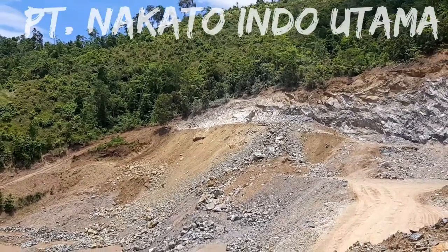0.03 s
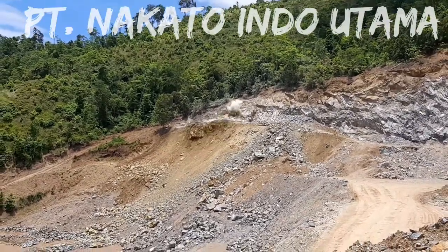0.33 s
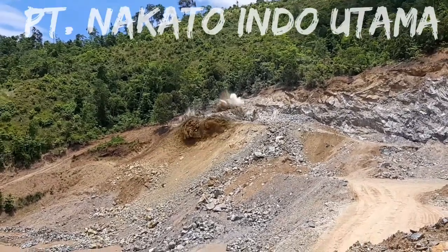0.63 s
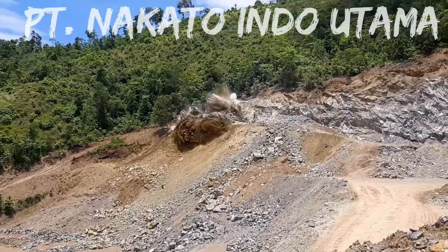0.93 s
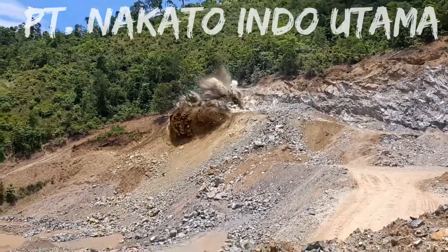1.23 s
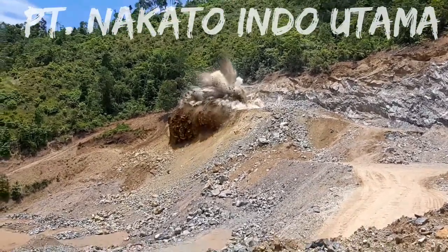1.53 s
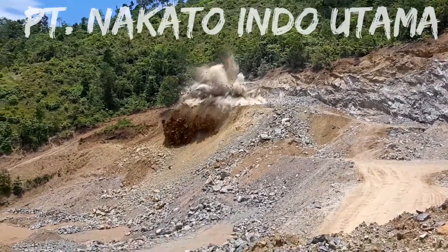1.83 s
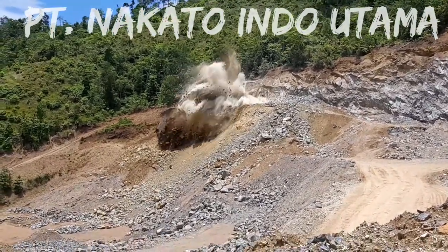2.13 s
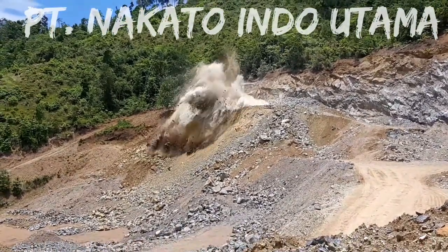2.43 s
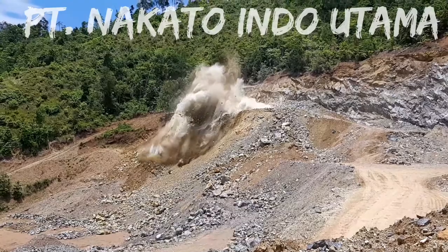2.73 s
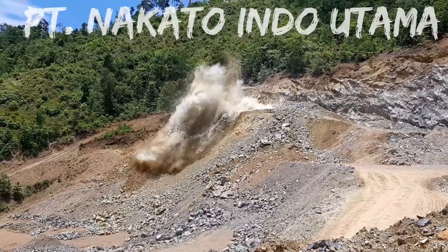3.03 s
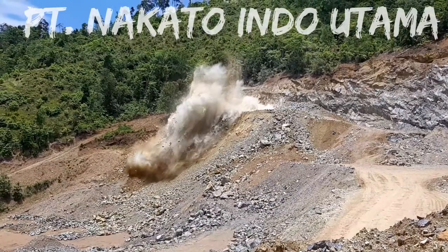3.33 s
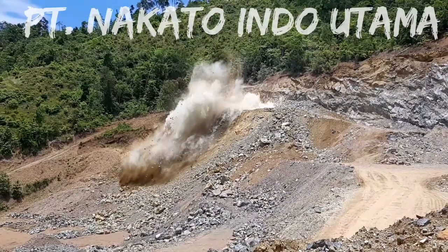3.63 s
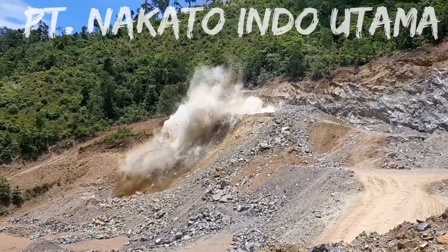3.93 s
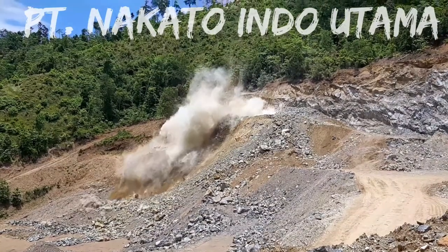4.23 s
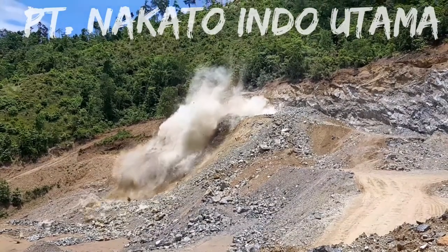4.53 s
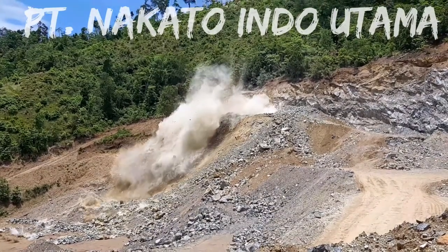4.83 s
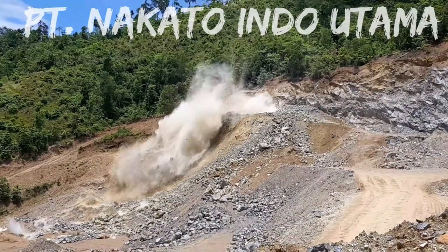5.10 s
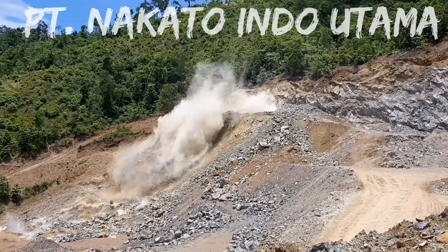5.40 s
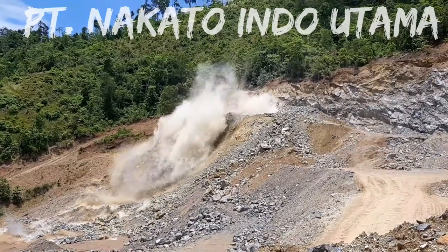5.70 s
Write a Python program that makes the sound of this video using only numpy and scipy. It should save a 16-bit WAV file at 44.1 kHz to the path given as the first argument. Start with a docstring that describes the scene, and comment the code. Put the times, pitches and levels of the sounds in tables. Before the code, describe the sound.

A low ground rumble with a few dull thumps starts immediately, heard outdoors from across a quarry. At about 0.6 seconds a heavy blast thuds, with a brief tearing of rock and a spurt of gas. At 0.8 seconds a sharp, punchy crack follows, scattering off the hillside in a short hissing echo. The rumble fades by about 1.5 seconds, leaving a lull with faint trickling stones.

From around 2 seconds a rockslide swells, and the bulk of the rock lands at 3 seconds. Boulders thump heavily between 3.2 and 4 seconds over a dense roar of clattering stones and hissing gravel. The slide grows brighter as it nears, and from about 4.3 to 5.7 seconds big rocks knock together, burst and splinter with sharp clacks. The slide is still pouring, slightly weaker, at the end near 6 seconds.

```python
"""A quarry blast heard from across the pit. The ground shakes first and the blast thuds;
the rock tears open and vents gas, then the air shock cracks and scatters off the hillside.
The thrown rock lands and pours down the slope: boulders thump, stones clatter, gravel hisses.
Heavy blows are single pressure swings; rumble, echoes and slide are mostly filtered random impacts."""
import sys
import numpy as np
from scipy import signal
from scipy.fft import rfft, irfft, next_fast_len
from scipy.io import wavfile
from scipy.ndimage import uniform_filter1d, map_coordinates

SR = 44100
rng = np.random.default_rng(int(sys.argv[2]) if len(sys.argv) > 2 else 0)


def generate_wav(signal):
    """Clip the signal to [-1, 1] and save it as 16-bit WAV at the path in sys.argv[1]."""
    frames = np.transpose(np.atleast_2d(signal))
    scaled = np.clip(frames, -1, 1) * 32767
    pcm = np.round(scaled).astype(np.int16)
    wavfile.write(sys.argv[1], SR, pcm)


N = 258426

# air and ground spectra: (frequency [Hz], gain [dB])
AIR_EQ = [(100, 0), (1000, -9), (4000, -17), (5500, -12), (8200, -22), (12000, -20), (16000, -26)]
GROUND_EQ = [(12, -40), (25, -14), (36, -12), (53, 3), (88, 4), (130, -4), (170, -13), (220, -19),
             (400, -50), (800, -100)]
BOOM_EQ = [(20, -35), (55, -1), (90, 2), (130, 2), (175, -14), (260, -36), (600, -100)]
# falling rock spectra: (frequency [Hz], gain [dB])
THUMP_EQ = [(15, -16), (25, -43), (48, -3.5), (92, -0.5), (115, 2.5), (210, -11.5), (270, -58), (460, -120)]
STONE_EQ = [(110, -33.5), (190, -1.5), (247, -1), (290, 4.5), (345, -0.5), (520, 0), (640, 0.5), (770, -8),
            (1000, -5), (1200, -13.5), (1560, -38), (2640, -120)]
CHIP_EQ = [(700, -27.5), (1000, -0.5), (1200, -5), (1400, 6), (1560, 3.8), (1800, 5.7), (2000, 5.5),
           (2250, 0), (2600, -6), (2780, -0.5), (3050, -1.5), (3320, 0.5), (3560, -6), (3780, -2),
           (4050, -8.5), (4400, -10), (4900, -6), (5600, -11), (7500, -46)]
PEBBLE_EQ = [(1200, -12), (2000, -4), (2600, -25), (3350, 5), (3580, -3), (3820, 7), (4150, -2),
             (4800, -10), (6500, -21), (8200, -13.5), (9800, -9), (13000, -29), (15500, -52)]
GRIT_EQ = [(3060, -15.5), (5200, 1), (7170, -5.5), (8200, -15), (9040, -9), (9880, -11.5), (11000, -22),
           (14000, -29.5), (14800, -50), (15800, -35)]
CLACK_EQ = [(200, -18), (550, -2), (1200, -4), (1900, 0), (2600, -6), (3600, -3), (6000, -11), (8200, -22),
            (9700, -19), (15000, -47)]
RUBBLE_EQ = [(150, -15), (550, 3), (900, -4), (1200, -6), (1450, 0), (2100, -2), (2600, -13), (3600, -7),
             (8000, -27), (15000, -48)]
# blast and echo spectra: (frequency [Hz], gain [dB])
TEAR_EQ = [(120, -30), (220, -5), (300, 0), (450, -10), (650, -19), (900, -40), (1500, -65), (4000, -90)]
GAS_EQ = [(250, -10), (600, 12), (1100, 7), (2200, -9), (3200, -9), (4200, -20), (5500, -18), (8200, -40),
          (9700, -39), (15000, -58)]
SNAP_EQ = [(300, -6), (1400, 0), (2300, -9), (3100, -4), (4200, -20), (6000, -23), (8000, -35),
           (15000, -48)]
SHOCK_EQ = [(120, -10), (300, -2), (700, 2.5), (1000, -2), (1600, 1.5), (2600, -13), (3800, -12),
            (5000, -10), (7500, -22), (9500, -17), (15500, -27)]
ECHO_BODY_EQ = [(94, -21.5), (160, -3.5), (238, -9), (295, -3.5), (324, -11), (590, -11), (657, -17.5),
                (741, -18), (1090, -20), (1180, -15.5), (2800, -27), (3640, -58), (6160, -120)]
ECHO_TREBLE_EQ = [(1530, -33), (2600, 1.5), (3290, 5.5), (4960, 3.5), (8200, -14), (9400, -15),
                  (11800, -33), (14900, -33), (16000, -31)]
ECHO_HISS_EQ = [(500, -20), (1800, -2), (4000, -5), (5700, 0), (8200, -9), (9700, -6), (12700, -11),
                (15000, -24)]
SIZZLE_EQ = [(3500, -25), (5200, 0), (7700, -10), (9300, -1), (12000, -5), (15500, -16)]

# swells: (centre time [s], level [dB], sigma [s])
ECHO_HISS_SWELLS = [(0.248, -65, 0.029), (0.84, -37.5, 0.03), (1.095, -39.5, 0.021), (1.22, -51, 0.0049)]  # bright hiss, mostly the shock's echo
LANDFALL = [(3.03, -24.5, 0.13)]  # bulk of the thrown rock
SLAB_BURSTS = [(4.703, -17.5, 0.012), (4.935, -20, 0.007), (5.27, -26, 0.035)]
GROAN = [(0.632, -30, 0.011)]  # rock about to give way
# surges: (time [s], level [dB], hold [s])
FACE_BOOMS = [(0.636, -11, 0.018), (0.68, -23, 0.11), (0.812, -13, 0.044), (1.012, -20.5, 0.014),
              (1.12, -34, 0.025)]  # heaving face and its returns
GRAVEL_SHEETS = [(2.33, -49, 0.2), (3.675, -40.5, 0.062), (3.82, -43, 0.13), (4.915, -49, 0.016),
                 (5.17, -51, 0.098)]
HEAPS = [(3.12, -17.5, 0.036), (3.41, -17.5, 0.045), (3.49, -14.5, 0.027), (3.62, -17.5, 0.16),
         (3.992, -21.5, 0.051), (4.4, -21.5, 0.086), (4.74, -19, 0.024), (4.945, -20.5, 0.11),
         (5.39, -22.5, 0.028), (5.51, -22, 0.012), (5.6, -22, 0.022), (5.71, -21, 0.018)]  # rocks landing together
CREAKS = [(0, -55, 0.12), (0.215, -52, 0.14), (0.42, -52.5, 0.3)]
SHOCKS = [(0.7817, -7.5, .0028), (0.785, -19, .006), (0.795, -30, .008), (0.8105, -20, .004),
          (0.821, -25, .004), (0.832, -27, .002), (0.843, -26, .003), (0.8525, -22.5, .004)]  # air shock and its nearest returns
# blows: (time [s], level [dB], pitch [Hz])
BOULDERS = [(3.239, -14, 173), (3.2596, -4.5, 298), (3.352, -11.5, 106), (3.425, -22, 110),
            (3.518, -15, 133), (3.646, -18, 100), (3.758, -12, 130), (3.768, -5.5, 122),
            (3.809, -10.5, 186), (3.826, -10.5, 127), (4.002, -13.5, 125), (4.024, -25, 119),
            (4.629, -24, 600), (4.754, -17, 89), (4.786, -10.5, 88), (4.869, -10.5, 141),
            (4.926, -13.5, 450), (4.977, -11.5, 250), (4.991, -8.5, 166), (5.068, -16.5, 129),
            (5.2, -11.5, 290), (5.259, -8, 1350), (5.3, -12, 273)]
BLAST_BLOWS = [(0.166, -16.5, 56.3), (0.2, -8.5, 49.7), (0.237, -21.5, 215), (0.327, -15, 64),
               (0.348, -20, 204), (0.416, -15, 232), (0.470, -35, 267), (0.6378, -3, 265),
               (0.6445, -11, 380), (0.647, -6.5, 142), (0.656, -4.5, 120), (0.7675, -15.5, 700),
               (0.775, -14, 380), (0.7838, -5.5, 1190), (0.787, -13, 700), (0.790, -6, 198),
               (0.795, -8, 302), (0.814, -15, 600), (0.820, -6.5, 131), (0.856, -8, 114), (0.865, -5, 109)]  # thuds of the blast and the punch of the shock's crack
# rock splitting or striking rock: (time [s], level [dB], t60 [s], splinters re body [dB])
CLACKS = [(4.298, -22, .02, -14), (4.443, -15.5, .036, -17), (4.669, -24, .016, -4), (4.687, -18, .02, -16),
          (4.7025, -19, .04, -18), (4.9248, -15, .022, -9), (5.055, -18.5, .034, -7),
          (5.1772, -19, .012, 1), (5.201, -19, .014, -8), (5.236, -17.5, .016, -14),
          (5.258, -13, .014, -10), (5.431, -17, .032, -18), (5.535, -17.5, .017, -16),
          (5.712, -23, .05, -16)]
# face snapping ahead of the shock: (time [s], level [dB], t60 [s])
SNAPS = [(0.7668, -24, 0.037)]

# amount of rock on the move: (time [s], level [dB])
FLOW = [(1.4, -52.5), (1.72, -50), (2.18, -43), (2.49, -36), (2.99, -29), (3.06, -28), (3.45, -31.5),
        (3.66, -30.5), (3.9, -28.5), (4.33, -27), (4.57, -25), (4.9, -27.5), (5.28, -25), (5.44, -28.5),
        (5.86, -31)]
# slide brightening as it nears: (time [s], tilt [dB])
SLIDE_TILT = [(1.6, -4.5), (3.05, -1), (3.5, -0.5), (3.72, -2), (3.9, 3.5), (4.95, 1.5), (5.35, 4.5),
              (5.86, -1.5)]
# hillside decay: (frequency [Hz], t60 [s])
HILL_T60 = [(100, 0.85), (1000, 0.17), (10000, 0.086)]
# scattering slopes, near to far: (delay [s], rise [s], hold [s], body [dB], treble [dB], body fall [dB/s])
SLOPES = [(0.008, 0.016, 0.023, -22, -36, 222), (0.017, 0.057, 0.2, -28, -40.5, 32),
          (0.265, 0.05, 0.049, -37, -43, 201), (0.384, 0.03, 0.04, -54, -51, 150)]
# resonances in which two microphone ports differ: (centre [Hz], width [Hz], level [dB])
PORTS = [(90.2, 12, -11), (290, 280, -17.5)]

BREAK_S, SHOCK_S = 0.634, SHOCKS[0][0]


def amp(db):
    return 10 ** (np.asarray(db) / 20)


def clock():
    return np.arange(N) / SR


def curve(rows):
    return np.interp(clock(), *np.transpose(rows))


def log_interp(points, hz):
    knots_hz, values = np.transpose(points)
    return np.interp(np.log(hz + 1), np.log(knots_hz + 1), values)


def colour(x, eq):
    """Minimum-phase filter of unit energy."""
    size = 16384
    gain = amp(log_interp(eq, np.fft.rfftfreq(size, 1 / SR)))
    cepstrum = irfft(np.log(np.maximum(gain, 1e-6)))
    cepstrum[1:size // 2] *= 2
    cepstrum[size // 2 + 1:] = 0
    response = irfft(np.exp(rfft(cepstrum)))
    return signal.fftconvolve(x, response / np.linalg.norm(response))[:N]


def burst(start_s, rise_s, hold_s, fall_db_per_s):
    """Smooth onset; decay begins hold_s after the start."""
    t = clock() - start_s
    onset = np.sin(np.pi / 2 * np.clip(t / rise_s, 0, 1)) ** 2
    return onset * amp(-fall_db_per_s * np.maximum(t - hold_s, 0))


def surges(rows, rise_s, fall_db_per_s):
    return sum(amp(db) * burst(at_s, rise_s, hold_s, fall_db_per_s) for at_s, db, hold_s in rows)


def swells(rows):
    return sum(amp(db) * np.exp(-((clock() - at_s) / sigma_s) ** 2 / 2) for at_s, db, sigma_s in rows)


def wobble(knots_per_s):
    knots = rng.standard_normal(int(N * knots_per_s / SR) + 4)
    return map_coordinates(knots, [clock() * knots_per_s])


def patter(eq, hits_per_s, spread_db, clump_db):
    """Clumped random impacts of unequal size; rms 1 per quarter second."""
    hits = np.sqrt(rng.poisson(hits_per_s / SR, N)) * rng.choice([-1, 1], N)
    size_db = spread_db * np.clip(rng.standard_normal(N), -2, 2) + clump_db * wobble(knots_per_s=45)
    impacts = colour(hits * amp(size_db), eq)
    power = np.abs(uniform_filter1d(impacts ** 2, SR // 4))
    return impacts / np.sqrt(power + 1e-12)


def thuds(rows):
    """One pressure swing per blow; heavier blows swing more slowly."""
    pressure = np.zeros(N)
    for at_s, db, hz in rows:
        phase = 2 * np.pi * hz * (clock() - at_s)
        pressure += amp(db) * phase * np.exp((1 - phase ** 2) / 2)
    return pressure


def cracks(rows, eq):
    """Sudden fractures: fast-decaying noise bursts."""
    t = clock()
    envelope = sum(amp(db - 60 * np.abs(t - at_s) / t60_s) * (t >= at_s) for at_s, db, t60_s in rows)
    return colour(envelope * rng.standard_normal(N), eq)


def hillside(x, wet_db):
    """Adds scatter from the rough slope; treble dies first."""
    hz, t, noise = signal.stft(rng.standard_normal(SR // 2), SR, nperseg=256)
    decay = amp(-60 * t / log_interp(HILL_T60, hz)[:, None])
    tail = signal.istft(noise * decay, SR, nperseg=256)[1]
    return x + amp(wet_db) * signal.fftconvolve(x, tail / np.linalg.norm(tail))[:N]


def air():
    """Faint open-air hiss and bright hissing swells, mostly the shock's echo."""
    echo_hiss = swells(ECHO_HISS_SWELLS) * patter(ECHO_HISS_EQ, hits_per_s=6000, spread_db=3, clump_db=1)
    return echo_hiss + amp(-72.5) * colour(rng.standard_normal(N), AIR_EQ)


def tremor():
    """The ground wave outruns the air and rumbles on under the booms of the face."""
    first_shake = amp(-23.5) * burst(0, rise_s=0.003, hold_s=0.02, fall_db_per_s=50)
    quake = amp(-20) * burst(0.145, rise_s=0.03, hold_s=0.5, fall_db_per_s=22)
    booms = surges(FACE_BOOMS, rise_s=0.003, fall_db_per_s=137)
    ground = patter(GROUND_EQ, hits_per_s=900, spread_db=1, clump_db=0.5)
    booming = patter(BOOM_EQ, hits_per_s=900, spread_db=1, clump_db=0.5)
    return (first_shake + quake) * ground + booms * booming


def gravel():
    """Loose gravel lets go in sheets, each a step in the hiss."""
    sheets = surges(GRAVEL_SHEETS, rise_s=0.024, fall_db_per_s=124)
    return sheets * patter(GRIT_EQ, hits_per_s=4200, spread_db=5, clump_db=2.5)


def knocks(count, centre_hz=3000, spread_octaves=0.6, spread_db=2, t60_cycles=36):
    """Single stones ring briefly, each at its own pitch; rms 1."""
    t = np.arange(SR // 40) / SR
    pitch, size = np.clip(rng.standard_normal((count, 2)), -2, 2).T[:, :, None]
    cycles = centre_hz * 2 ** (spread_octaves * pitch) * t
    rings = amp(spread_db * size - 60 * cycles / t60_cycles) * np.sin(2 * np.pi * cycles)
    indices = rng.integers(0, N, (count, 1)) + np.arange(len(t))
    ringing = colour(np.bincount(indices.ravel(), rings.ravel(), N)[:N], CHIP_EQ)
    return ringing / np.sqrt(np.mean(ringing ** 2) + 1e-20)


def rockfall(full_flow_db=-26.5):
    """Rock lands in heaps and slides; smaller fragments strike more often and sound higher."""
    flow_db, tilt_db = curve(FLOW), curve(SLIDE_TILT)
    build_up = np.clip((clock() - SHOCK_S) / (FLOW[0][0] - SHOCK_S), 0, 1)
    thin_db = np.maximum(full_flow_db - flow_db, 0)  # thin flow loses its heaviest and finest first
    roll = patter(THUMP_EQ, hits_per_s=220, spread_db=3.5, clump_db=-1)
    stones = patter(STONE_EQ, hits_per_s=800, spread_db=0, clump_db=0.5)
    chips = patter(CHIP_EQ, hits_per_s=4500, spread_db=2.8, clump_db=0.8)
    grit = patter(GRIT_EQ, hits_per_s=8000, spread_db=2.6, clump_db=0.8)
    pebbles = patter(PEBBLE_EQ, hits_per_s=1500, spread_db=3.5, clump_db=1.6)
    heaps = patter(THUMP_EQ, hits_per_s=600, spread_db=0.5, clump_db=-1)
    landfall = swells(LANDFALL) * patter(STONE_EQ, hits_per_s=900, spread_db=2.5, clump_db=1)
    roll *= amp(3 - 0.99 * tilt_db - 0.26 * thin_db)
    stones *= amp(4 - 0.94 * tilt_db)
    chips *= amp(-0.78)
    grit *= amp(-9 + 0.34 * tilt_db - 0.11 * thin_db)
    pebbles *= swells([(5.14, -5, 0.63)])  # nearest stones run out ahead of the slide
    heaps *= surges(HEAPS, rise_s=0.0022, fall_db_per_s=398)
    slide = roll + stones + chips + grit + pebbles + amp(-8.5) * knocks(count=2600)
    return amp(flow_db) * build_up * slide + heaps + landfall


def landings():
    """Single big rocks thump, knock together and splinter, or burst."""
    rubble = swells(SLAB_BURSTS) * patter(RUBBLE_EQ, hits_per_s=4000, spread_db=3, clump_db=1)
    clacks = cracks([(at_s, db, t60_s) for at_s, db, t60_s, _ in CLACKS], CLACK_EQ)
    splinters = cracks([(at_s, db + sharp_db, t60_s) for at_s, db, t60_s, sharp_db in CLACKS], GRIT_EQ)
    return rubble + splinters + hillside(thuds(BOULDERS) + clacks, wet_db=-13)


def echoes(treble_fall_ratio=0.86):
    """Countless rocks and trees return small copies of the shock; bright hiss trails it."""
    body = treble = 0
    for delay_s, rise_s, hold_s, body_db, treble_db, fall_db_per_s in SLOPES:
        start_s = SHOCK_S + delay_s
        body += amp(body_db) * burst(start_s, rise_s, hold_s, fall_db_per_s)
        treble += amp(treble_db) * burst(start_s, rise_s, hold_s, fall_db_per_s * treble_fall_ratio)
    body *= patter(ECHO_BODY_EQ, hits_per_s=2500, spread_db=1, clump_db=2)
    treble *= patter(ECHO_TREBLE_EQ, hits_per_s=7000, spread_db=0.5, clump_db=1)
    sizzle = amp(-39.5) * burst(SHOCK_S, rise_s=0.003, hold_s=0.03, fall_db_per_s=66)
    return body + treble + sizzle * colour(rng.standard_normal(N), SIZZLE_EQ)


def venting():
    """Strained rock creaks and tears open; gas spurts, jets and sprays grit."""
    strain = surges(CREAKS, rise_s=0.006, fall_db_per_s=303) + swells(GROAN)
    spurt = burst(BREAK_S, rise_s=0.0023, hold_s=0.0044, fall_db_per_s=439)
    jet = burst(BREAK_S + 0.034, rise_s=0.011, hold_s=0.18, fall_db_per_s=300)
    spray = amp(-50.5) * burst(BREAK_S + 0.044, rise_s=0.014, hold_s=0.018, fall_db_per_s=380)
    tear = strain + amp(-24.5) * spurt + amp(-31.5) * jet
    gas = amp(-37.5) * spurt + amp(-45) * jet
    tear *= patter(TEAR_EQ, hits_per_s=2500, spread_db=3, clump_db=1.5)
    gas *= patter(GAS_EQ, hits_per_s=5000, spread_db=3, clump_db=1)
    spray *= patter(GRIT_EQ, hits_per_s=8000, spread_db=3, clump_db=1)
    return tear + gas + spray


def shock(relax_s=0.0016):
    """Air pressure jumps and relaxes; the ragged front and its nearest returns slap."""
    age = (clock() - SHOCK_S) / relax_s
    front = amp(-3) * (age >= 0) * (1 - age) * np.exp(-np.abs(age))
    slaps = surges(SHOCKS, rise_s=0.0002, fall_db_per_s=5500) * rng.standard_normal(N)
    return colour(slaps, SHOCK_EQ) - front


def blast():
    """The blast thuds, the face tears and snaps, the shock cracks with a punch and echoes."""
    blows = hillside(thuds(BLAST_BLOWS), wet_db=-19)
    return blows + venting() + cracks(SNAPS, SNAP_EQ) + shock() + echoes()


def scene():
    """Mono sum: one far spot on the slope."""
    return tremor() + blast() + rockfall() + gravel() + landings() + air()


def record(dry, low_hz=30, top_hz=15750):
    """Near-mono stereo from two close ports, soft-clipped and band-limited."""
    size = next_fast_len(N + SR // 2)
    hz = np.fft.rfftfreq(size, 1 / SR)
    resonances = sum(amp(db) * 1j * hz * width_hz / (centre_hz ** 2 - hz ** 2 + 1j * hz * width_hz)
                     for centre_hz, width_hz, db in PORTS)
    side_response = 1j * resonances / (1 + (hz / 800) ** 8)
    side = irfft(rfft(dry, size) * side_response, size)[:N]
    pair = np.array([dry + side, dry - side])
    clipped = pair / (1 + np.abs(pair) ** 8) ** (1 / 8)
    band = hz ** 4 / (hz ** 4 + low_hz ** 4) / (1 + (hz / top_hz) ** 120)
    return irfft(rfft(clipped, size) * band, size)[..., :N]


dry = scene()
out = record(dry)
generate_wav(out)
```